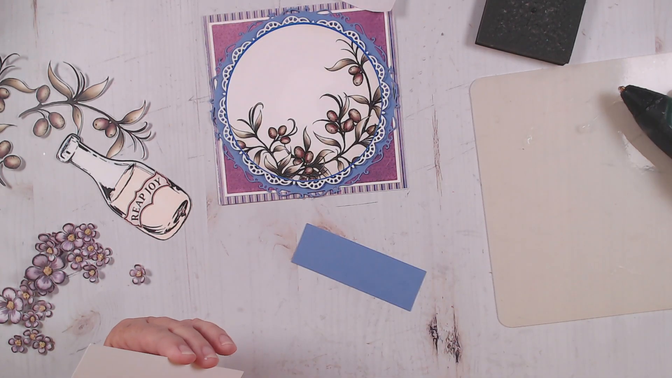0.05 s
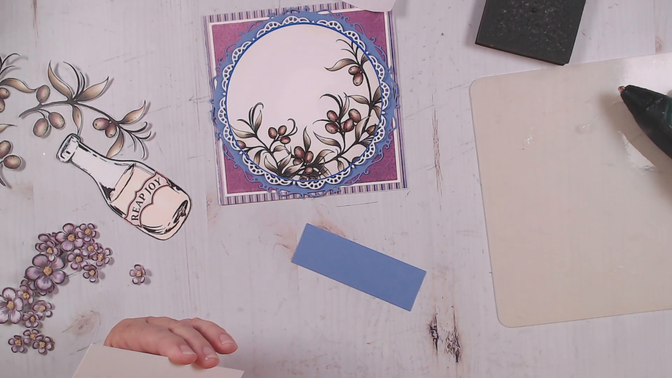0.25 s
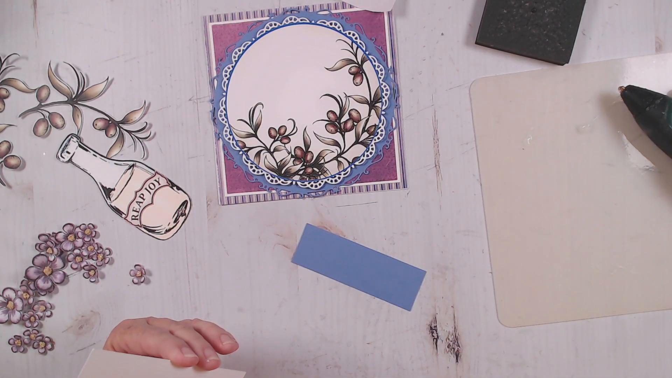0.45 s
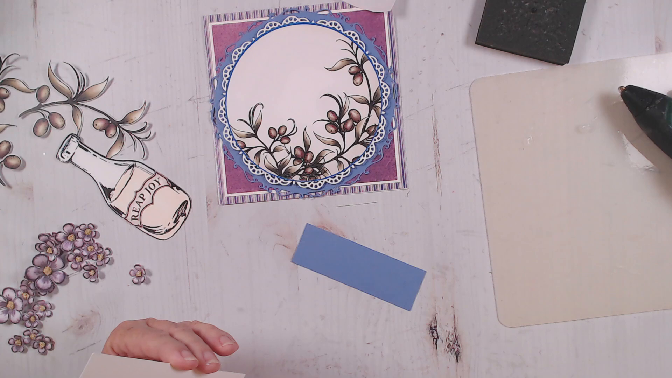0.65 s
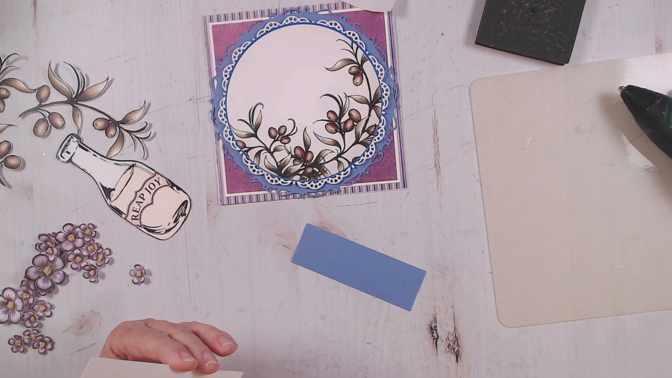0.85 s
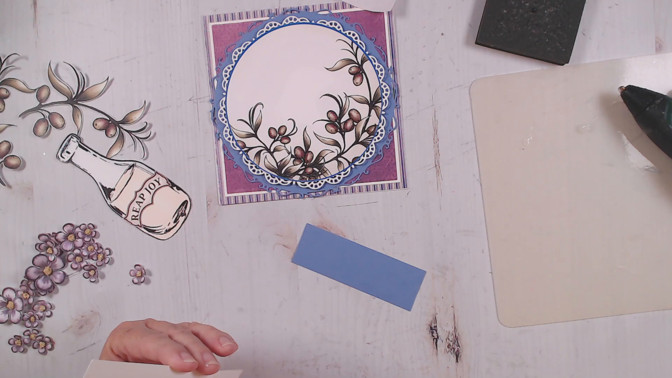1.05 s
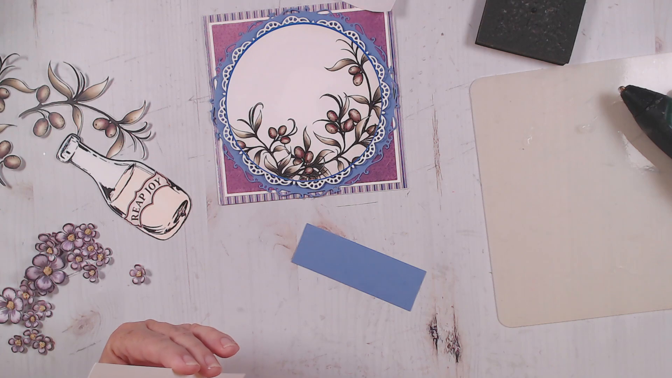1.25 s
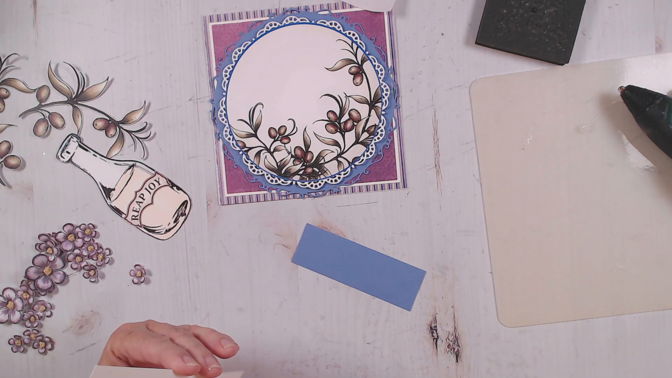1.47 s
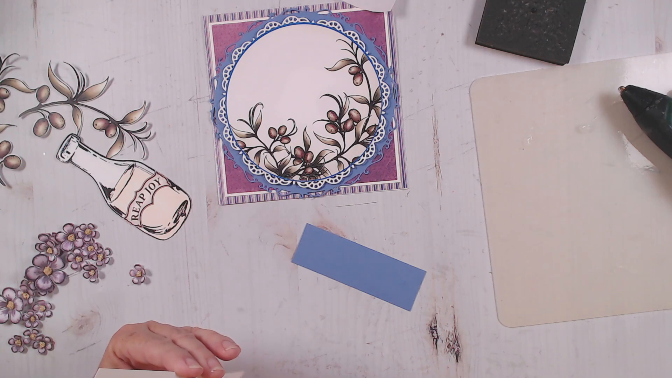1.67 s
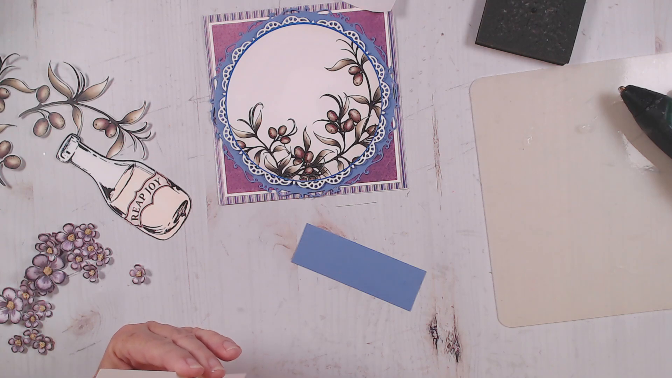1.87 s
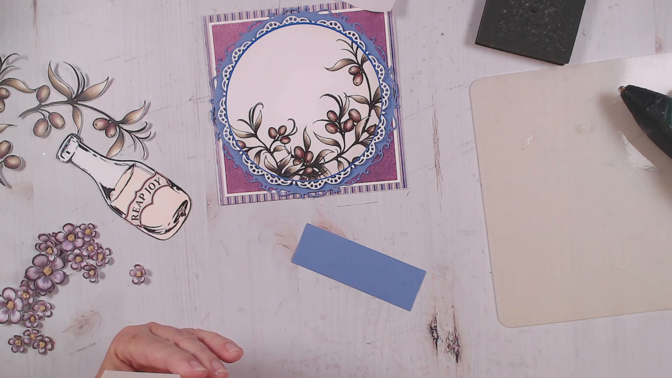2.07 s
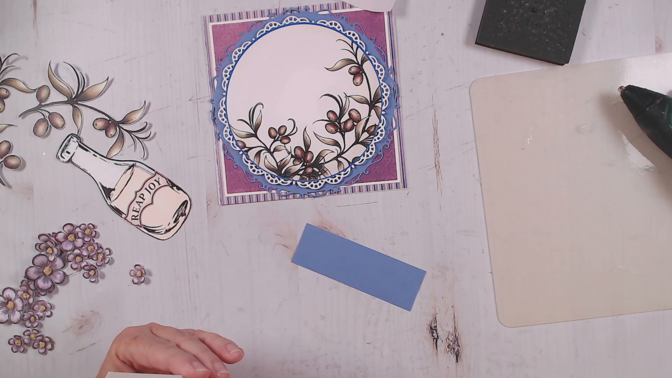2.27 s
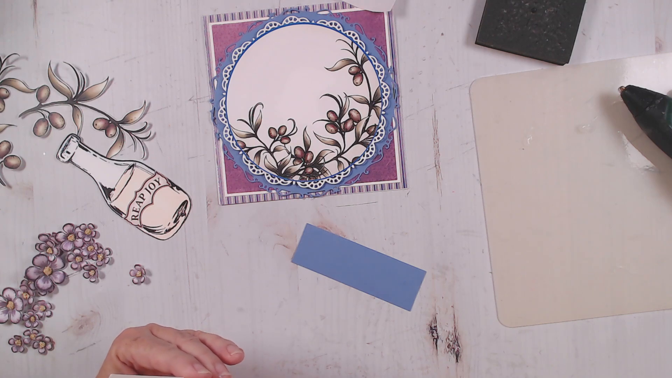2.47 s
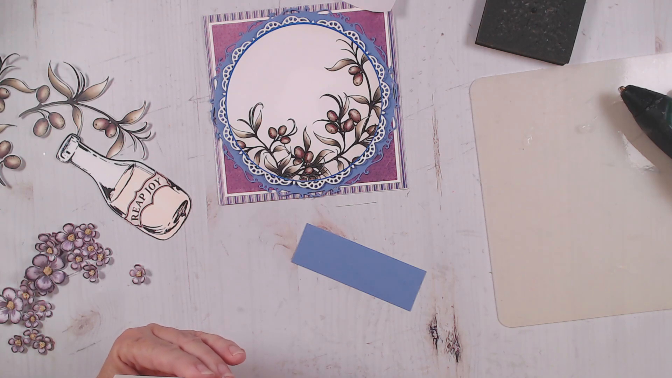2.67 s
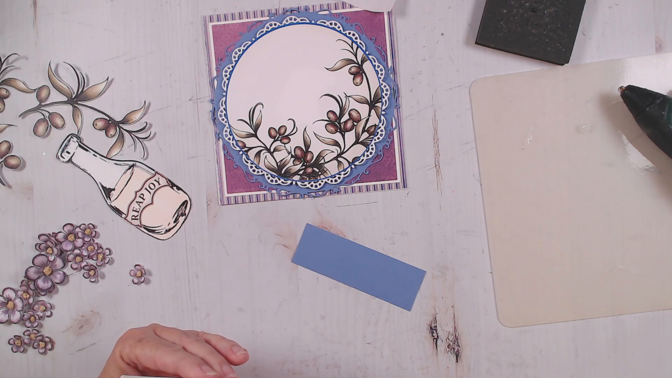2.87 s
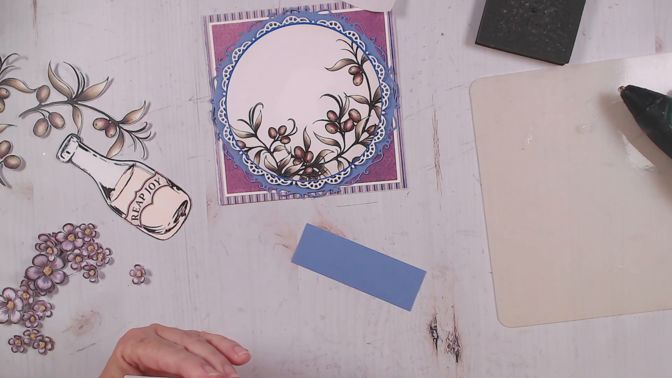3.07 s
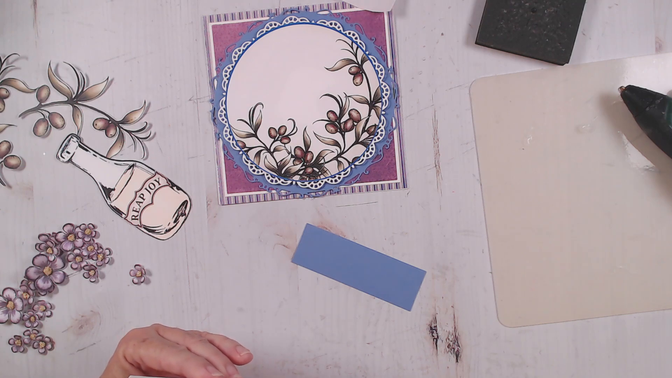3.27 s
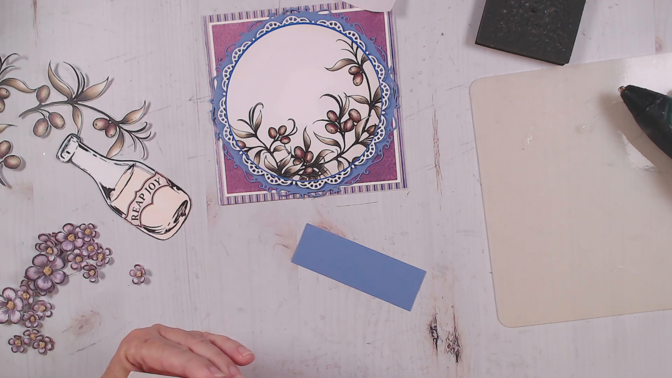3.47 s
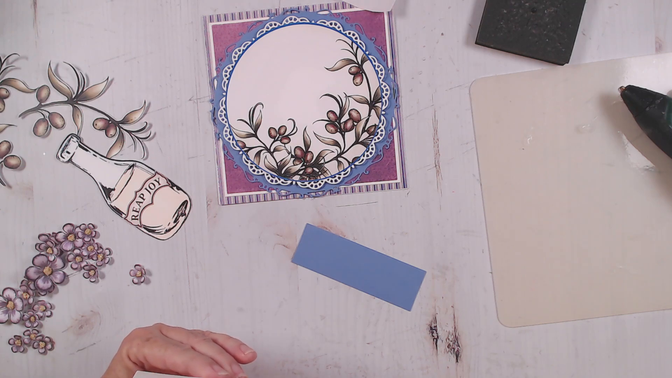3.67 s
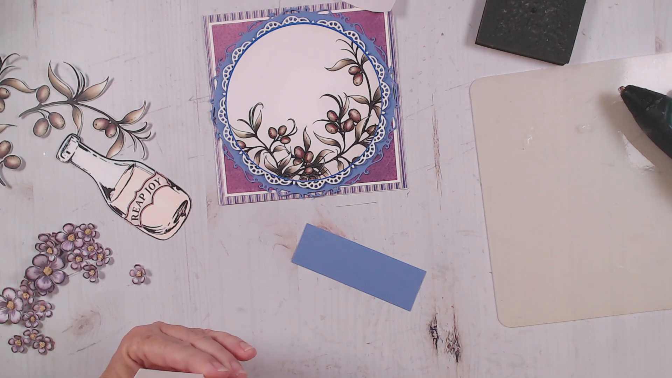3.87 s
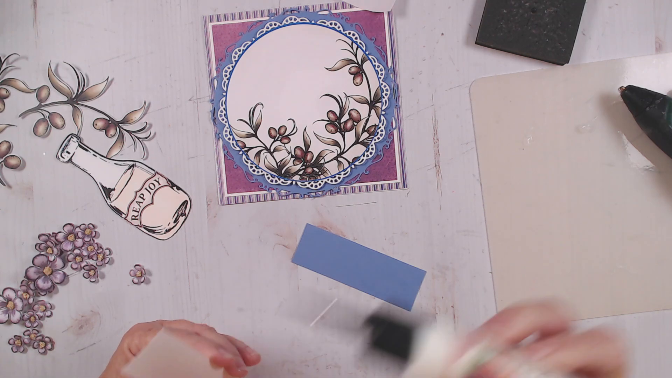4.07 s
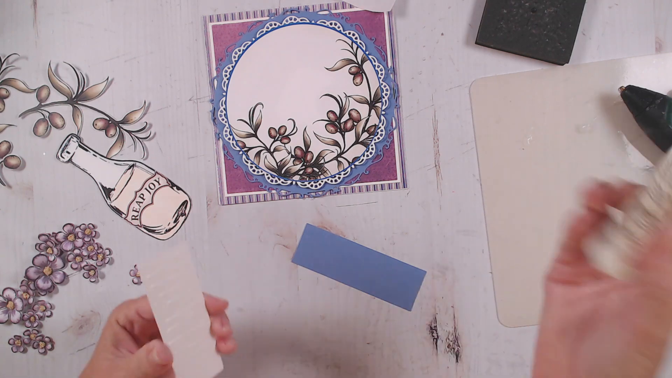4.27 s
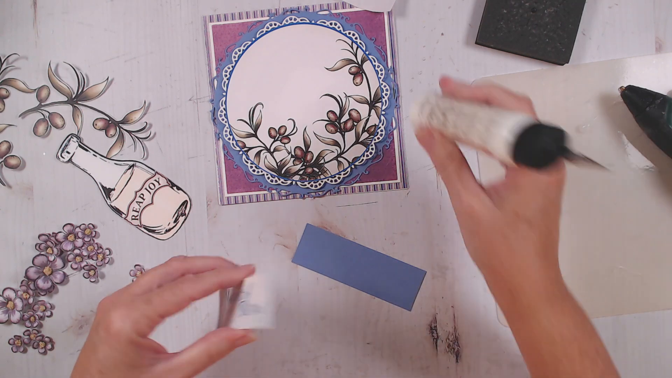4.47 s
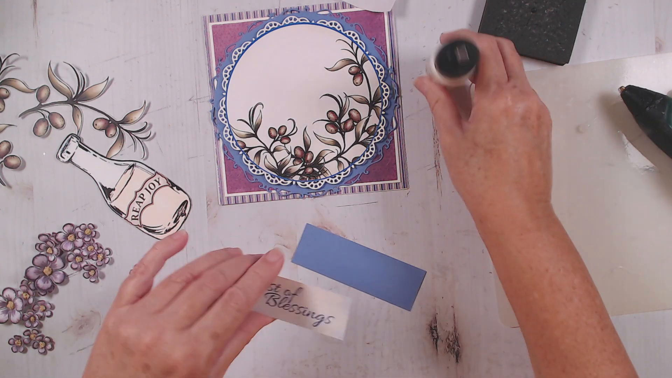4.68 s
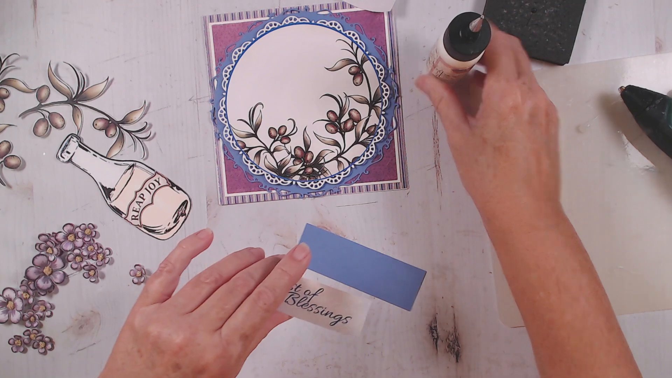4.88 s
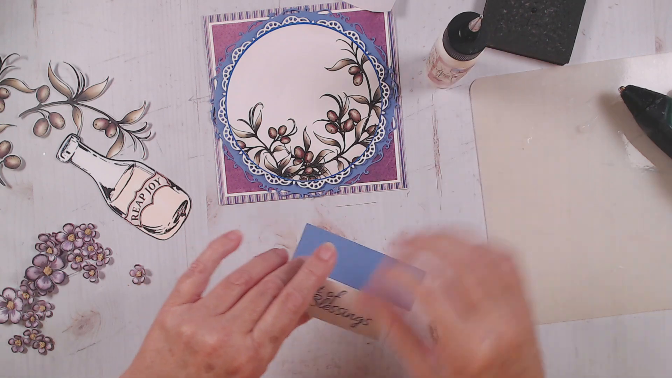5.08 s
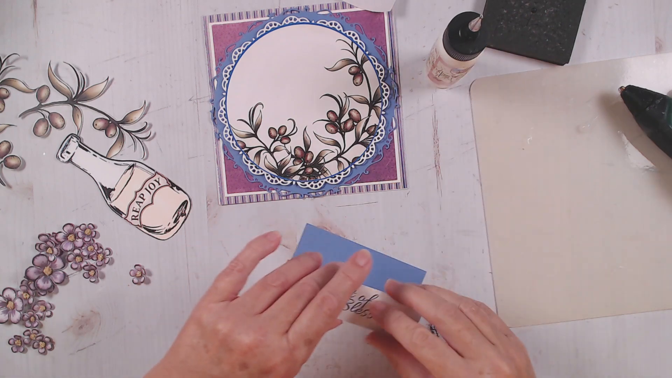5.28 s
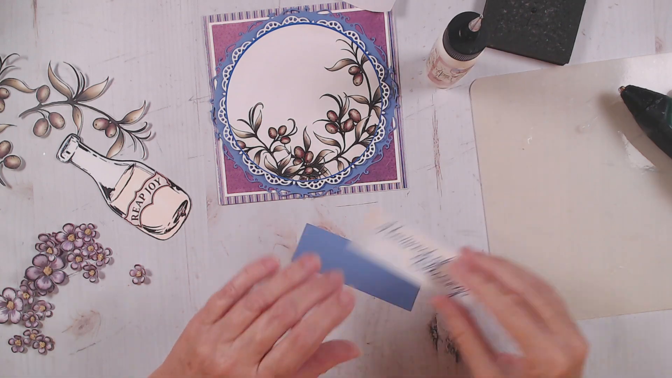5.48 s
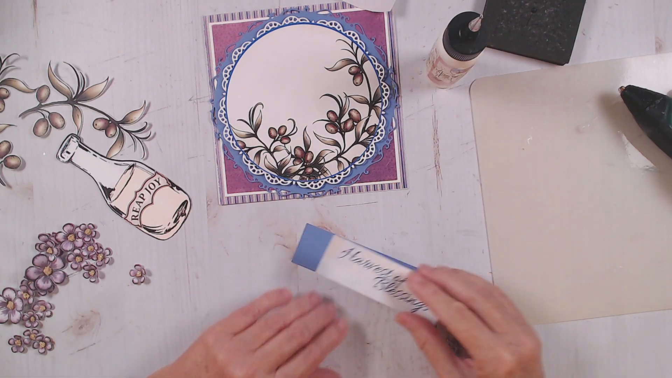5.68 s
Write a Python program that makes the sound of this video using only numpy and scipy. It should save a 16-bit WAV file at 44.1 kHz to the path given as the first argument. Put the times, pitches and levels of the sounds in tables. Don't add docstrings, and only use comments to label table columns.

```python
import sys
import numpy as np
from scipy import signal
from scipy.fft import rfft, irfft, next_fast_len
from scipy.io import wavfile
from scipy.ndimage import uniform_filter1d, minimum_filter1d, map_coordinates

SR = 44100
rng = np.random.default_rng(int(sys.argv[2]) if len(sys.argv) > 2 else 0)


def unload_audio(sound):
    columns = np.transpose(np.atleast_2d(sound))
    steps = np.round(np.clip(columns, -1, 1) * 32767)
    wavfile.write(sys.argv[1], SR, steps.astype(np.int16))


def ratio_of_db(decibels):
    return 10 ** (np.asarray(decibels, float) / 20)


N = 252693

# [full contact t/s, hold/s, scratch level/dB, hiss over scratch/dB, bending f/Hz]
TOUCHES = [
    (.668, 0.0015, -58.5, -8, 1080),
    (.768, 0.0063, -61.5, 0, 1184),
    (.899, .002, -59.5, -12, 960),
    (.992, 0.039, -72.5, -7, 900),
]
# [full contact t/s, hold/s, scratch level/dB, hiss over scratch/dB, bending f/Hz]
AWAY = [(1.11, 0.044, -52.5, -10.5, 1080), (1.323, 0.038, -50.5, -11, 964), (1.539, 0.027, -48, -12, 900),
        (1.749, 0.045, -47.5, -14.5, 903), (1.981, 0.017, -45, -14.5, 850.3), (2.185, 0.039, -47, -12, 861),
        (2.404, 0.038, -47, -13.5, 819), (2.606, 0.023, -49, -10, 1069), (2.811, 0.033, -51, -9, 1249),
        (3.019, 0.028, -48.5, -8.5, 855), (3.219, 0.037, -54.5, -2, 1003), (3.47, .006, -46.5, -8.5, 869),
        (3.722, 0.0088, -55, -3.5, 1304)]
# [full contact t/s, hold/s, scratch level/dB, hiss over scratch/dB, bending f/Hz]
BACK = [(1.218, 0.041, -48, -4, 920), (1.43, 0.028, -43.5, -9.5, 900), (1.636, 0.043, -47.5, -8.5, 980),
        (1.867, 0.054, -51, -4.5, 950), (2.081, .039, -47.5, -9, 1018), (2.288, 0.047, -48, -5.5, 878),
        (2.504, 0.042, -53.5, -5, 1000), (2.701, 0.039, -51, -2.5, 1082), (2.917, 0.028, -51, -3.5, 790),
        (3.122, 0.033, -51, -3.5, 850), (3.358, 0.0049, -49.5, -2, 1090), (3.58, 0.011, -51, -2.5, 829)]
# [t/s, sheet centre f/Hz, bending level/dB, hiss tilt/dB per octave]
GRIP = [(.7, 3200, -16, 5), (.9, 2650, -12, 2.5), (1.1, 3100, -8, 0), (1.45, 3420, -14, -2),
        (1.75, 3148, -12, -1), (1.95, 3262, -12, 0), (2.35, 2900, -18, 0), (2.7, 3210, -10.5, -2),
        (3.0, 2850, -8.5, -1), (3.2, 3050, -8.5, -1.5), (3.47, 2800, -14, -2), (3.75, 2800, -7.5, -1.7)]
# [f/Hz, width/Hz, level/dB]
NOZZLE = [(2018, 70, 17.5), (2255, 69, 10.5), (2580, 11, -0.5), (2800, 73, 8), (2930, 15.5, 4),
          (2857, 68, -23), (3313, 51, 16.5), (3550, 20, 11), (3780, 21, 16), (4200, 127, 11.5),
          (4870, 175, 8), (6660, 49, 11), (7940, 190, 7.5), (8980, 300, 5), (10800, 440, 1.5)]


def scribble():
    hz, t, slips = rough_noise(grain_db=2.4, grain_ms=1.6, patchy_db=3.6, drift_db=2.2)
    rows = sorted(TOUCHES + AWAY + BACK)
    level = sum(stroke(t, *row[:3]) for row in rows)
    speed = uniform_filter1d(level, size=12) / -minimum_filter1d(-level, size=36).clip(None, -1e-9)

    start, hold, _, hiss_db, bend_hz = np.transpose(rows)
    middle = start + hold / 2
    hiss_db, bend_hz = np.interp(t, middle, hiss_db), np.interp(t, middle, bend_hz)
    turns = np.interp(t, middle, np.arange(len(rows)))
    travel = np.sin(np.pi * turns)
    back = -np.cos(np.pi * turns)

    at, *columns = np.transpose(GRIP)
    sheet_hz, bend_db, tilt_db = [np.interp(t, at, c) for c in columns]
    sheet_hz = sheet_hz * (1 + 0.033 * back)
    tilt_db = tilt_db + 1.5 * back
    bend_hz = bend_hz * (.9 - .07 * travel + .28 * travel ** 2)

    nozzle = raised(NOZZLE, hz)
    sheet = sheet_ring(hz, sheet_hz, travel, speed, nozzle)
    bend = power_one(np.abs(resonance(hz, bend_hz, 90)) ** 2 + .13 * np.abs(resonance(hz, 950, 550)) ** 3)
    hiss = fibre_hiss(hz, t, tilt_db, speed, nozzle)
    colour = sheet + ratio_of_db(bend_db) * bend + ratio_of_db(hiss_db) * hiss + palm_drum(hz, t, travel)
    rustle = heard(slips * (level * colour + after_ring(hz, t)))
    return strip_song(t, bend_hz, bend_db, level) + rustle


def stroke(t, s, hold, db):
    slow = 1 + 1.57 * max(s - 3.05, 0)
    attack_s, release_s, sag_db_per_s = 0.024, 0.033, 22
    corners = np.cumsum([s - slow * attack_s, slow * attack_s, hold, slow * release_s])
    half_db = sag_db_per_s * hold / 2
    bend = .7
    heights = [0, ratio_of_db(db + half_db) ** bend, ratio_of_db(db - half_db) ** bend, 0]
    return np.interp(t, corners, heights) ** (1 / bend)


# [f/Hz, level/dB per Hz]
SHEET = [(1500, -5.5), (1900, -8), (2600, 1), (3500, -5), (4500, -2), (5300, -12.5), (6500, -73)]


def sheet_ring(hz, sheet_hz, travel, speed, nozzle):
    split = 0.2 * speed ** 2
    off = np.log((hz + 1) / sheet_hz) + 0.041 * travel
    hump = .4 + np.exp(-((off - split) / .15) ** 2) + np.exp(-((off + split) / .15) ** 2)
    return power_one(ratio_of_db(along(SHEET, hz)) * nozzle * hump)


# [f/Hz, level/dB per Hz]
FIBRES = [(3060, -28.5), (5200, -2.5), (5470, -5), (6060, -1), (9430, -6), (11000, -2), (15800, -14.5)]
# [t/s, comb spacing f/Hz, strength/0-1]
MIRROR = [
    (1.1, 3300, 0.02),
    (2.0, 3650, 0.1),
    (2.7, 3470, 0.27),
    (3.1, 3250, 0.69),
    (3.7, 3070, 0.58),
]


def fibre_hiss(hz, t, tilt_db, speed, nozzle):
    at, *columns = np.transpose(MIRROR)
    spacing_hz, strength = [np.interp(t, at, c) for c in columns]
    spacing_hz = spacing_hz * (1.04 - 0.066 * speed)
    mirror = np.abs(1 + strength * np.exp(2j * np.pi * hz / spacing_hz))
    fibres = ratio_of_db(along(FIBRES, hz) + tilt_db * np.log2((hz + 1) / 9000))
    return power_one(fibres * nozzle * mirror)


# [t/s, level over scratch/dB]
PALM = [
    (1.1, -36),
    (1.9, -29.5),
    (2.1, -15),
    (2.4, -16),
    (2.65, -10.5),
    (3.0, -19),
    (3.6, -10.5),
]


def palm_drum(hz, t, travel):
    drum = np.abs(resonance(hz, 460 * (1 + 0.14 * travel), 90)) ** 2
    return ratio_of_db(np.interp(t, *np.transpose(PALM))) * power_one(drum)


# (loudest t/s, swell/s, fade/s, level/dB)
AFTERRING = (3.83, .07, .13, -72)


def after_ring(hz, t):
    return swell(t, *AFTERRING) * power_one(np.abs(resonance(hz, 2120, 260)) ** 2)


def strip_song(t, bend_hz, bend_db, level):
    song_db = bend_db - 4.5 + 5 * patches((1, len(t)), 1, 5)[0]
    seconds = np.arange(N) / SR
    pitch = np.interp(seconds, t, bend_hz)
    size = np.interp(seconds, t, level * ratio_of_db(song_db))
    return size * np.sin(2 * np.pi * np.cumsum(pitch) / SR)


# [loudest t/s, swell/s, fade/s, level/dB, brightness/dB]
BRUSHES = [(.005, .03, 0.047, -60, 1.5), (.115, .035, 0.031, -64.5, 5), (.17, .025, .03, -79, 0),
           (0.427, .004, 0.0091, -61.5, 4), (.46, .025, .08, -77.5, 11), (4.076, 0.085, 0.011, -70.5, -10),
           (4.21, 0.14, 0.32, -67, 1.5), (4.42, 0.18, 0.2, -73.5, 9), (4.608, 0.0066, .012, -59.5, 3),
           (4.67, 0.13, 0.077, -69, -19), (4.925, 0.08, .09, -56.5, 3.5), (5.17, .04, 0.04, -63.5, 0.5),
           (5.293, 0.029, 0.032, -61, -3), (5.42, 0.1, 0.24, -63, 2), (5.57, 0.13, 0.044, -71.5, -7),
           (5.61, .004, .008, -60, -17), (5.655, 0.12, 0.1, -64.5, -4)]
# [t/s, f/Hz]
BRUSH_TONE = [
    (0, 3640),
    (4.3, 3300),
    (4.9, 4200),
    (5.2, 3400),
    (5.4, 3000),
    (5.7, 2970),
]
# [f/Hz, level/dB per Hz]
SKIN = [(300, 2), (700, -6), (1500, -15), (2400, -6), (3500, -6.5), (6000, -7), (8000, -8), (12000, -53)]
# [f/Hz, level/dB per Hz]
SKIN_TOP = [(3240, -15), (5500, -15), (5820, -21.5), (9180, 0), (10100, 0.5), (15800, -7)]


def brushes():
    hz, t, rub = rough_noise(grain_db=1.8, grain_ms=2.5, patchy_db=1.4, drift_db=1.3)
    level = sum(swell(t, *row[:4]) for row in BRUSHES)
    bright = sum(ratio_of_db(row[4]) * swell(t, *row[:4]) for row in BRUSHES)
    hollow_hz = np.interp(t, *np.transpose(BRUSH_TONE))
    hollow = 1 + 0.93 * np.abs(resonance(hz, hollow_hz, 850)) ** 2
    body = power_one(ratio_of_db(along(SKIN, hz)) * hollow)
    top = power_one(ratio_of_db(along(SKIN_TOP, hz)))
    return heard(rub * (level * body + bright * top))


# [t/s, peak level/dB, centre f/Hz, wide crack over centre/dB]
TICKS = [(.370, -56, 2300, -29), (.3955, -46.5, 2930, -39), (.4240, -47, 1600, -16),
         (.468, -55, 10500, -21), (.592, -55, 2620, -14), (3.5455, -59, 2705, 0),
         (3.834, -46.5, 9500, -11.5), (3.931, -51, 9400, -13), (3.983, -39, 3780, -2),
         (4.047, -44.5, 4520, -6), (4.071, -40, 8400, -15), (4.0712, -42.5, 3000, -27),
         (4.154, -49, 2560, -18), (4.177, -38, 5000, -15), (4.184, -42.5, 3040, -9),
         (4.6039, -31.5, 5260, -7), (4.66, -59, 1600, -6), (4.693, -47.5, 3000, -9),
         (4.804, -49, 3700, -14), (4.818, -45, 3700, -21), (4.868, -57, 9920, 3), (5.142, -47, 2800, -12),
         (5.288, -50, 3000, -6), (5.295, -37.5, 9000, 1), (5.597, -29.5, 5260, -6), (5.604, -39, 4060, -4),
         (5.6735, -43.5, 3700, -8)]


def ticks():
    out, t = np.zeros(N + SR), np.arange(2048) / SR
    for s, db, hz, wide_db in TICKS:
        spike = 4.3 * (t == 0)
        rattle = (rng.standard_normal(len(t)) + spike) * ratio_of_db(-60 * t / .007)
        colour = lambda f: resonance(f, hz, 0.12 * hz) + ratio_of_db(wide_db) * resonance(f, 3200, 5300)
        crack = filtered(rattle, colour)
        out[round(s * SR):][:len(t)] += ratio_of_db(db) * crack / np.abs(crack).max()
    return out[:N]


# [t/s, peak level/dB, f/Hz]
KNOCKS = [(.370, -53.5, 300), (.4240, -46.5, 1050), (.501, -53, 397), (.513, -52, 397), (3.5455, -39, 460),
          (3.931, -56, 405), (3.983, -47.5, 735), (4.047, -50, 330), (4.6039, -33.5, 1220),
          (4.6044, -39.5, 620), (4.66, -52, 1300), (4.693, -51, 556), (4.804, -56.5, 1700),
          (4.818, -61, 585), (5.142, -57, 500), (5.295, -54, 740), (5.597, -46.5, 770), (5.604, -55, 800)]


def knocks():
    out, t = np.zeros(N + SR), np.arange(2048) / SR
    for s, db, hz in KNOCKS:
        damped = lambda f: 1j * resonance(f, hz, 0.33 * hz) * resonance(f, hz, 0.91 * hz)
        knock = filtered(1. * (t == 0), damped)
        out[round(s * SR):][:len(t)] -= ratio_of_db(db) * knock / np.abs(knock).max()
    return out[:N]


# [t/s, low modes level/dB, high modes level/dB, legs level/dB, contact/ms]
THUMPS = [(3.984, -59, -65, -64, 2.5), (4.043, -81, -62, -78, 4.1), (4.177, -61, -41, -65, 9.2),
          (4.66, -23, -21.5, -48, 3.2), (4.691, -53, -28, -53, 2.7), (4.752, -62, -40, -72, 10),
          (4.806, -38.5, -40.5, -63, 4.8), (4.8207, -46, -31.5, -60, 7.8), (5.141, -74, -61, -67, 5.8),
          (5.495, -70, -49, -75, 14), (5.535, -72, -51, -75, 12), (5.586, -60, -48, -53.5, 4),
          (5.605, -48, -29.5, -57, 16)]
# (t/s, low modes level/dB, high modes level/dB, legs level/dB, contact/ms)
SET_DOWN = (4.6037, -6.3, -26, -36, 2.6)
# [f/Hz, level/dB, time to fall 60 dB/s]
TABLE_LEGS = [(47.4, -7, 0.92), (87.2, 3.5, 0.24)]
# [f/Hz, level/dB, time to fall 60 dB/s]
TABLE_LOW = [(100, -13, .08), (128.5, 0, .107), (178, -12.5, .13), (215, -.5, .092)]
# [f/Hz, level/dB, time to fall 60 dB/s]
TABLE_DENT = [(165, 11, .023)]
# [f/Hz, level/dB, time to fall 60 dB/s]
TABLE_PAIR = [(203.5, -6, .23), (210.3, -5, .2)]
# [f/Hz, level/dB, time to fall 60 dB/s]
TABLE_HIGH = [(260, -20, 0.032), (320, -24.5, 0.08), (376, -26.5, 0.18), (592, -33, 0.074)]


def table():
    out, t = np.zeros(N + SR), np.arange(SR) / SR

    def ring(modes):
        return sum(ratio_of_db(db - 60 * t / t60) * np.sin(2 * np.pi * hz * t) for hz, db, t60 in modes)

    legs = ring(TABLE_LEGS)
    low = ring(TABLE_LOW) - ring(TABLE_DENT)
    high = ring(TABLE_PAIR + TABLE_HIGH)
    for s, low_db, high_db, legs_db, contact_ms in THUMPS + [SET_DOWN]:
        push = np.clip(t * 1000 / contact_ms, 0, 1)
        boom = ratio_of_db(high_db) * high - ratio_of_db(low_db) * low - ratio_of_db(legs_db) * legs
        out[round(s * SR):][:len(t)] += push * boom
    return out[:N]


# [f/Hz, time to fall 60 dB/s]
ROOM = [(100, 0.99), (500, 0.79), (1500, 0.15), (2200, 0.32), (4000, 0.2), (12000, 0.025)]


def room(x):
    hz, t, z = signal.stft(rng.standard_normal(SR // 2), SR, nperseg=256)
    fade = ratio_of_db(-60 * t / along(ROOM, hz)[:, None])
    tail = signal.istft(z * fade, SR, nperseg=256)[1]
    delayed = np.pad(x, (200, 0))
    return signal.fftconvolve(delayed, tail / np.linalg.norm(tail))[:N]


# [f/Hz, level/dB per Hz]
HUSH = [(12, -48), (20, -4.5), (65, -3.5), (162, -7.5), (233, -6), (431, -9.5), (510, -14), (603, -15),
        (693, -17), (1430, -19), (2060, -25.5), (2650, -23), (5780, -28), (9560, -28), (15800, -31.5)]
# [f/Hz, width/Hz, level/dB]
HUSH_BANDS = [(139.6, 8, 11.5), (224.4, 11, 8.5), (300, 20.5, 6.5), (391, 9.7, 4), (9100, 23, -23),
              (10500, 940, 7)]


def hush():
    hz, t, z = rough_noise(grain_db=1.3, grain_ms=4.6, patchy_db=1.5, drift_db=0.6)
    colour = lambda f: ratio_of_db(along(HUSH, f)) * raised(HUSH_BANDS, f)
    return ratio_of_db(-61) * unit(filtered(heard(z), colour))


def rough_noise(grain_db, grain_ms, patchy_db, drift_db):
    knots = rng.standard_normal(N)
    grains = ratio_of_db(grain_db * map_coordinates(knots, [np.arange(N) * 1000 / (grain_ms * SR)], order=1))
    noise = unit(grains * rng.standard_normal(N))
    hz, t, z = signal.stft(noise, SR, nperseg=512, noverlap=384)
    hz = hz[:, None]
    fine_db = patchy_db / (1 + (hz / 7000) ** 2) * patches(z.shape, 2, 6)
    wide_db = drift_db * np.tanh(hz / 1500) * patches(z.shape, 14, 14)
    return hz, t, z * unit(ratio_of_db(fine_db + wide_db))


def heard(z):
    return signal.istft(z, SR, nperseg=512, noverlap=384)[1][:N]


def patches(shape, tall, long):
    field = uniform_filter1d(rng.standard_normal(shape), size=tall, axis=0)
    field = uniform_filter1d(field, size=long, axis=1)
    return unit(uniform_filter1d(field, size=long, axis=1))


def swell(t, s, rise, fade, db):
    ramp = np.interp(t, [s - rise, s, s + fade], [0, 1, 0])
    return ratio_of_db(db) * np.sin(np.pi / 2 * ramp) ** 2.05


def unit(x):
    return x / np.sqrt(np.mean(x ** 2) + 1e-20)


def power_one(gain):
    return gain / np.sqrt(np.mean(gain ** 2, axis=0))


def along(points, hz):
    f, v = np.transpose(points)
    return np.interp(np.log(hz + 1), np.log(f + 1), v)


def filtered(x, response):
    m = next_fast_len(len(x) + 8192)
    return irfft(rfft(x, m) * response(np.fft.rfftfreq(m, 1 / SR)), m)[:len(x)]


def resonance(f, hz, width):
    return 1j * f * width / (hz * hz - f * f + 1j * f * width)


def raised(bands, f):
    return 1 + sum((ratio_of_db(db) - 1) * np.abs(resonance(f, hz, width)) ** 2 for hz, width, db in bands)


def scene():
    near = scribble() + brushes() + ticks() + knocks()
    boom = table()
    far = room(ratio_of_db(-15) * near + ratio_of_db(-31) * boom)
    return (near + boom + far + hush())[None]


def band_limit(x):
    return signal.sosfilt(signal.butter(12, 16740, fs=SR, output="sos"), x)


def record(dry):
    limited = filtered(dry[0], lambda f: np.where(f < 15830, 1, ratio_of_db(-32)))
    return band_limit(limited[None])


dry = scene()
out = record(dry)
unload_audio(out)
```